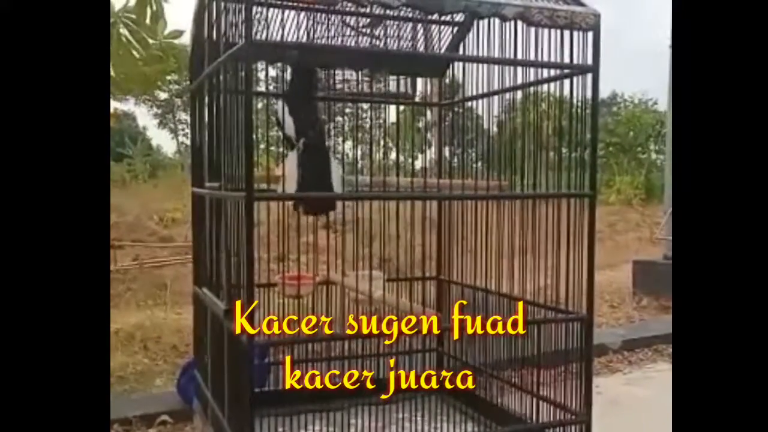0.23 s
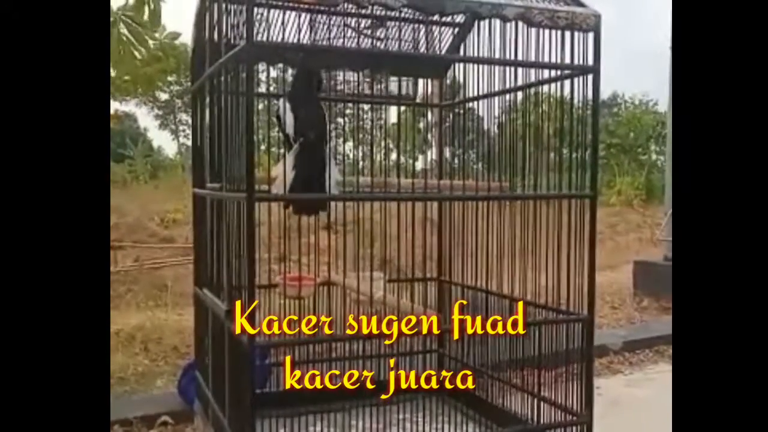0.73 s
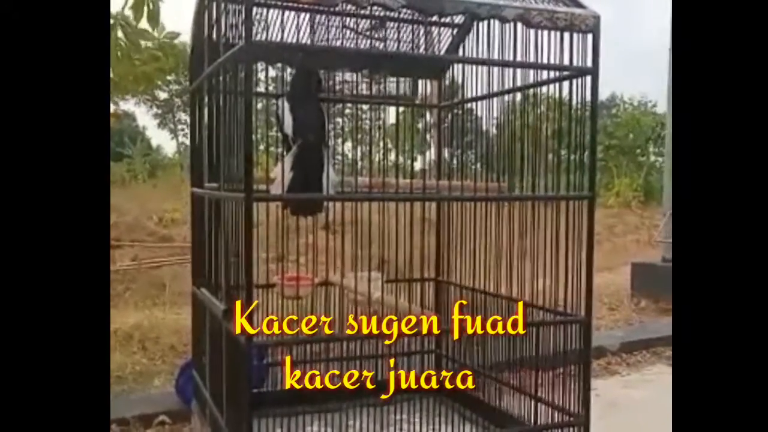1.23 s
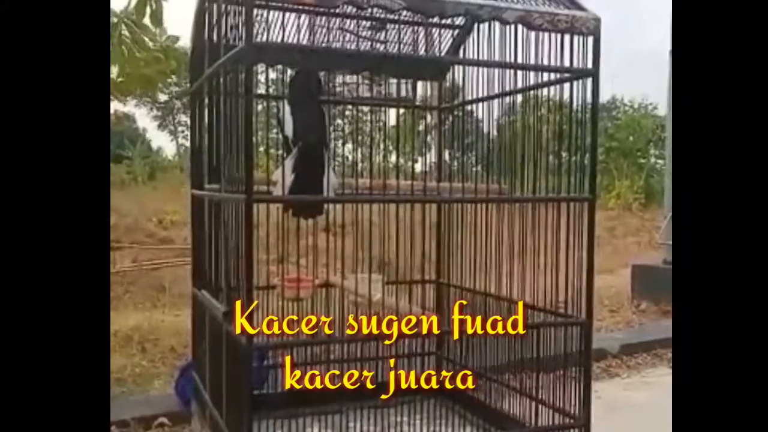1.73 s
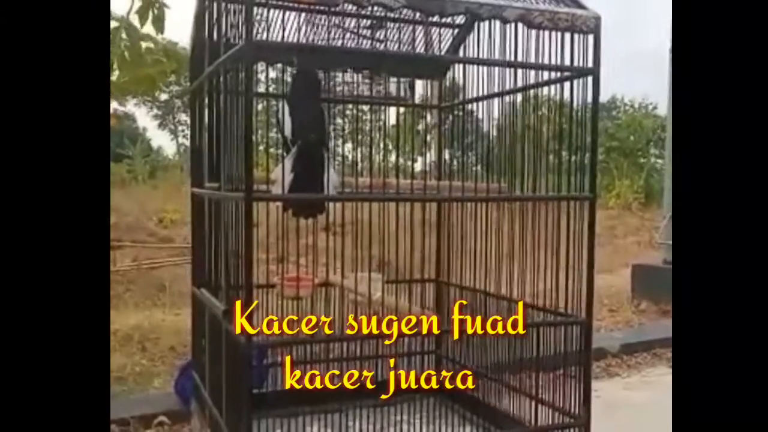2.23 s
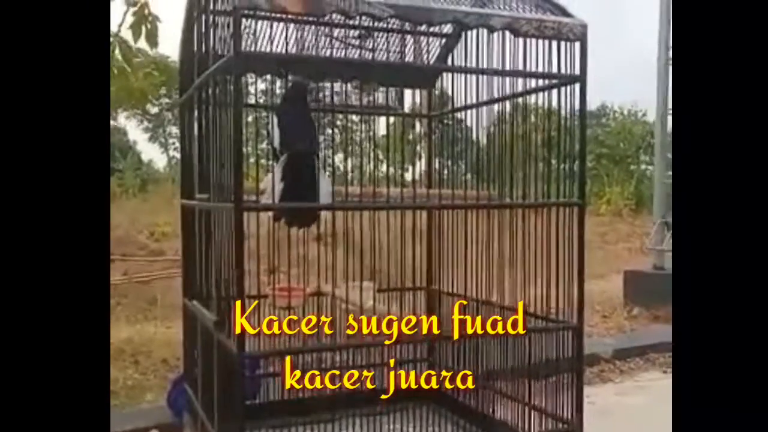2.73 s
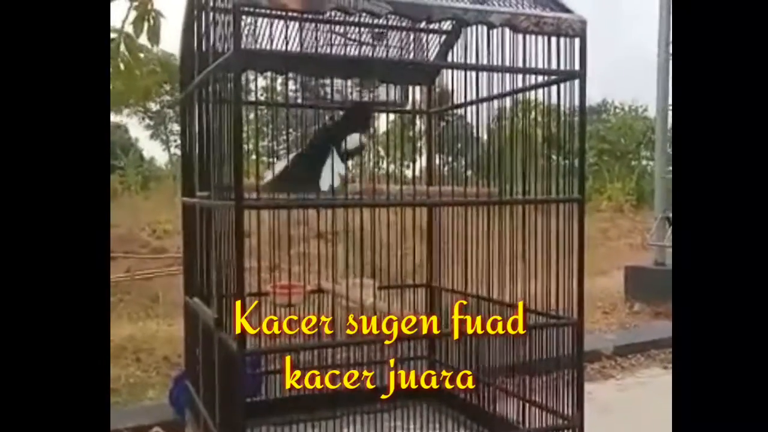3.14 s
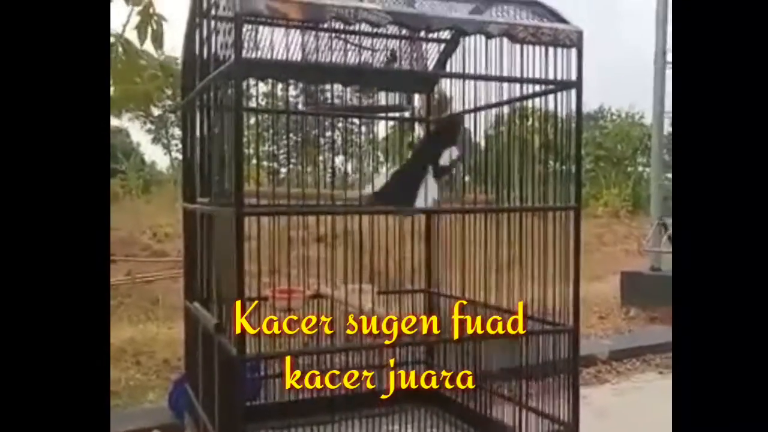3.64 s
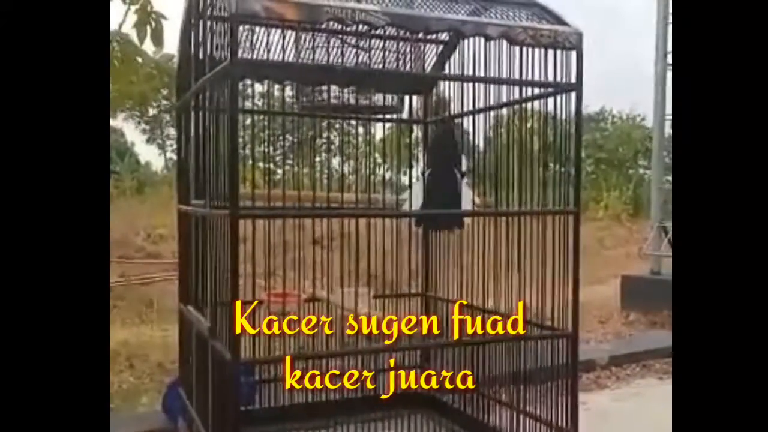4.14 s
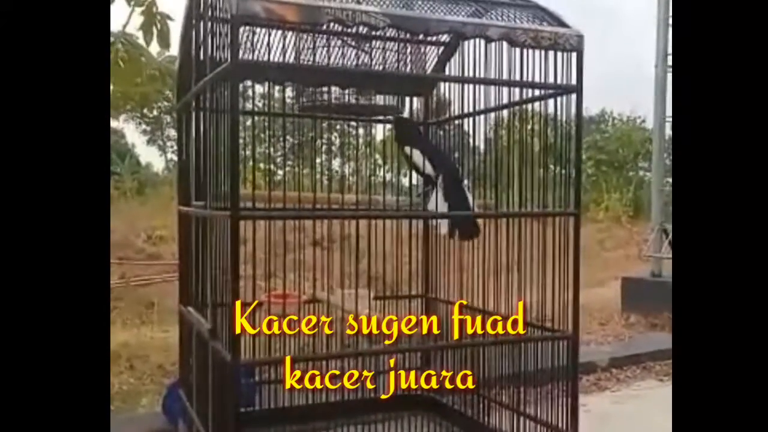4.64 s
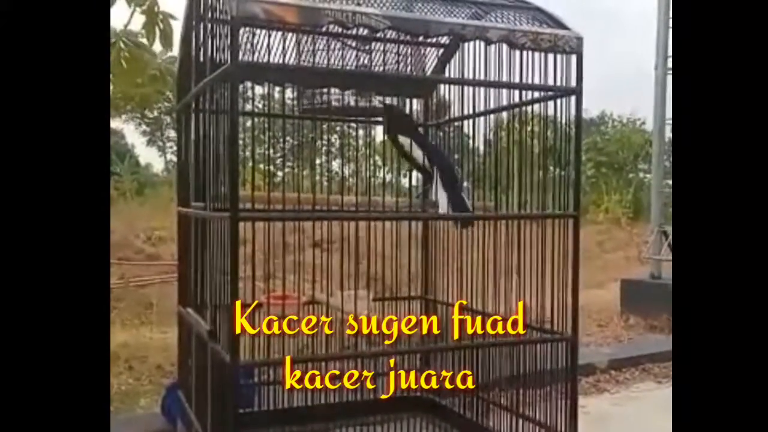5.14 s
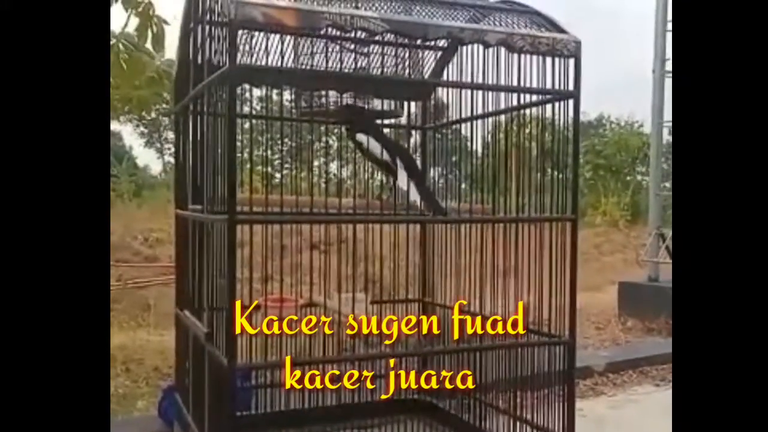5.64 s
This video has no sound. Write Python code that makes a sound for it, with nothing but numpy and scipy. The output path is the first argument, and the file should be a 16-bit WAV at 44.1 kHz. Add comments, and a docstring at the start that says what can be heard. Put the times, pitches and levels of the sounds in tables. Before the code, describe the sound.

A caged songbird sings close to the microphone outdoors, dry and bright, with a faint scattered echo from ground and trees. From 0 to 0.4 s four rapid buzzy trill bursts rattle over a soft low wind bump. A rasp and wavering whistle follow, then a longer nasal note at 0.7 s and small chirps. Around 1.25-1.45 s a strong whistle rises and holds; quick chirps and a loud falling warble lead to a steep downward whistle at 1.9 s. After a short gap, jumpy whistles grow loud at 2.2-2.5 s. Wind puffs bump until 2.8 s. From 2.8 to 3.3 s comes dense scratchy chatter with nasal rasp; a distant rooster wavers behind, 2.4-3.9 s. Clear warbles rise near 4 s, then sharp chirps, flicks and short nasal buzzes until 5.1 s. A thin upward-leaping whistle follows, and faint trills end from 5.55 s. Hum and leaf rustle fade late.

```python
"""Four buzzy trill bursts over a bump of wind, then a caged magpie-robin's varied song, close by outdoors.
Long whistles, chirps, warbles and flicks are gliding sines from the syrinx; nasal rasps are harmonic stacks
through a throat resonance. Fainter trill bursts close the scene. Ground, cage and trees answer as decaying
noise echoes. Behind: shaped-noise wind, hum and rustle, a far cock and a faint held tone."""
import sys
import numpy as np
from scipy import signal
from scipy.fft import rfft, irfft, next_fast_len
from scipy.io import wavfile
from scipy.ndimage import uniform_filter1d, minimum_filter1d, map_coordinates

SR = 44100
rng = np.random.default_rng(int(sys.argv[2]) if len(sys.argv) > 2 else 0)


def master(y):
    """Save y as 16-bit WAV."""
    cut = np.clip(np.atleast_2d(y).T, -1, 1)
    pcm = np.round(cut * 32767)  # scale
    wavfile.write(sys.argv[1], SR, pcm.astype(np.int16))


N = 258861

# background levels: (time [s], wind before its gain [dB], hum [dB], leaf rustle [dB])
AIR_LEVELS = [(0, -38.5, -46, -42.5), (.46, -48.5, -41.5, -38), (1.8, -47.5, -45.5, -44),
              (3.56, -48, -44.5, -43), (4.9, -57.5, -51, -46), (5.87, -63, -61.5, -58)]
# wind puffs on the microphone: (time of peak [s], peak level [dB])
WIND_PUFFS = [(.02, -29), (0.242, -28), (0.502, -31.5), (0.629, -35), (0.978, -33), (1.19, -26.5),
              (2.287, -26), (2.833, -25)]
# noise spectra of wind, hum and leaves: (frequency [Hz], relative density [dB per Hz])
WIND_SPECTRUM = [(20, -37), (70, 0), (125, -3.5), (210, -13.5), (1000, -70)]
HUM_SPECTRUM = [(60, -15.5), (120, 3), (260, -2.5), (350, -7), (550, -7.5), (1000, -13), (1800, -25),
                (4000, -46.5), (9000, -79.5)]
RUSTLE_SPECTRUM = [(700, -22), (1600, -7), (3200, 0), (4300, -6), (5200, -27), (7000, -35), (9500, -48),
                   (15000, -53)]
# far cock, one curve per crow: (time [s], base pitch [Hz], level [dB])
COCK_CROWS = [
    [(2.4, 633.5, -50), (3.1, 556.5, -51), (3.55, 684, -41), (3.8, 640, -57), (3.92, 600, -54)],
]
# faint held tone: (time [s], pitch [Hz], level [dB])
FAR_TONE = [(.86, 1987, -47.5), (1.7, 1975, -42.5)]
# decay of the tree echo: (frequency [Hz], t60 [s])
TREE_DECAY = [(3000, 0.7), (12000, 0.048)]

# beak opening, gain on overtones and hiss: (time [s], gain [dB])
BEAK_OPENING = [(0, 2.5), (.9, 0.5), (1.35, -5), (1.7, -3), (2.0, -4), (2.24, 12), (2.4, -17), (2.85, 8.5),
                (3.8, 4.5), (4.0, -2), (4.7, 9.5), (5.3, 1.5)]
# how overtones get out of the beak: (frequency [Hz], gain [dB])
BEAK_RESPONSE = [(4500, 11.5), (5800, -2.5), (7600, -2), (9800, -21.5), (11500, -14), (16000, -12.5)]
# second, third and fourth harmonic of a whistled tone, before the beak: (level [dB] each)
WHISTLE_OVERTONES_DB = (-36.5, -43, -47.5)
# throat resonance of nasal notes: (frequency / resonance [ratio], gain [dB])
THROAT_RESPONSE = [(.3, -26), (.5, -20.5), (.75, 4.5), (1, 6.5), (1.25, 3), (1.7, -23.5), (2.2, -32),
                   (3.6, -64.5)]

# soft chatter between and under the notes: (start [s], end [s], level [dB])
CHATTER_STRETCHES = [(2.827, 3.249, -35.5), (3.821, 3.928, -34.5), (4.13, 5.161, -41), (5.42, 5.56, -40.5)]
# quick sweeps linking notes: (start [s], from [Hz], to [Hz], level [dB])
FLICK_SWEEPS = [ (.850, 4510, 6610, -36.5), (1.512, 3620, 2100, -27.5), (2.904, 2520, 4470, -24.5),
                (2.924, 4960, 3330, -31.5), (3.079, 2200, 4930, -27), (3.163, 5710, 2474, -33),
                (3.225, 2765, 5600, -26.5), (3.368, 4140, 6270, -42.5), (4.592, 5650, 2870, -29),
                (4.731, 2260, 5780, -39), (4.807, 4240, 2976, -22), ]
# trill bursts: (start [s], level [dB], upper voice level [dB])
TRILL_BURSTS = [(-.04, -20.5, -36.5), (.042, -19, -34.5), (.144, -19.5, -35), (0.249, -20.5, -35.5),
                (5.558, -38, -39.5), (5.659, -32, -42.5), (5.747, -34.5, -41), (5.852, -36.5, -42)]
# parts of a burst: (time from part start [s], pitch [Hz], relative level [dB])
TRILL_LEAD_IN = [(-.022, 2600, -9.5), (-.007, 1800, -22.5), (0, 2000, -12.5)]
TRILL_UPSWEEP = [(0, 2100, -7), (.005, 2750, 0), (.014, 4800, -6)]
TRILL_STROKE = [(0, 4900, -5), (.004, 3650, -1), (.007, 2750, 1), (.0095, 2250, -14)]
TRILL_UPPER = [(0, 5700, -7), (.005, 6450, 1), (.014, 5100, -1)]
# nasal notes: (start [s], length [s], first, middle, last pitch before sag [Hz], level [dB], swell [dB],
# throat resonance at start, at end [Hz], roughness [0-1])
NASAL_NOTES = [ (.435, .052, 1170, 1224, 1362, -23, -4, 3130, 2610, 0.89),
               (.722, 0.25, 779, 864, 781, -18.5, -5, 3320, 2730, 0.2),
               (1.069, 0.091, 1193, 964, 920, -23, -1, 2430, 2390, 0.35),
               (2.968, 0.18, 684, 741.6, 715, -31.5, -7, 2610, 2400, 0.823),
               (3.218, 0.043, 659, 656, 672, -23.5, 3.5, 2530, 1830, 0.37),
               (4.462, 0.045, 997, 862, 897, -26, 4, 3700, 3000, .6),
               (4.806, .056, 1450, 1500, 1950, -22.5, 0, 3050, 3100, .14),
               (4.937, .056, 1258, 1386, 1450, -22, -5, 3200, 3400, .24),
               (5.048, 0.06, 960, 1290, 1083, -25.5, 6, 2460, 3000, 0.44), ]
# short chirps; overlapping ones come from the two sides of the syrinx:
# (start [s], length [s], first, middle, last pitch [Hz], level [dB], swell [dB])
CHIRP_NOTES = [ (0.487, .068, 4010, 4060, 3500, -29.5, 1.5), (0.555, 0.02, 6020, 6020, 5870, -47.5, -7.5),
               (0.62, 0.048, 2200, 3070, 4090, -34, 1), (0.645, .034, 4465, 3240, 4040, -27, -1),
               (0.771, .044, 4680, 5035, 4410, -35.5, 12.5), (0.819, 0.028, 3557, 3240, 3210, -20, -9.5),
               (0.898, 0.028, 3670, 3770, 4050, -20, 4), (1.38, .066, 4650, 4510, 4570, -36, 7.5),
               (1.47, 0.016, 4440, 2940, 3850, -19.5, -1.5), (1.488, .028, 3820, 3874, 3740, -26, -11.5),
               (1.53, 0.012, 2235, 2820, 4160, -27.5, -3.5), (1.541, .076, 4480, 4155, 4100, -21, 17),
               (1.568, 0.035, 2880, 3880, 2500, -24, -2), (1.691, .072, 4260, 4950, 4480, -28, 7.5),
               (1.738, .054, 3200, 2980, 2563, -8, 14), (1.778, .034, 3965, 3880, 3235, -22, -0.5),
               (1.786, 0.033, 2640, 2070, 1770, -30.5, -15), (1.83, 0.025, 2995, 4180, 4790, -23.5, -9.5),
               (2.438, 0.056, 3260, 3570, 3636, -14.5, -1.5), (2.828, .034, 2846, 3200, 4220, -31, -2.5),
               (2.862, 0.046, 3280, 2750, 2630, -29, -5.5), (2.922, 0.041, 4080, 4840, 4360, -38.5, 3),
               (2.997, 0.027, 3760, 3934, 4190, -29.5, -4.5), (3.037, 0.046, 3690, 3240, 2550, -27.5, 1.5),
               (3.054, 0.032, 6960, 5520, 5580, -44, -3), (3.086, 0.041, 4370, 4030, 3885, -25.5, 10),
               (3.129, 0.039, 7000, 5880, 6220, -39, -5), (3.167, 0.016, 2490, 2310, 2350, -34, 5.5),
               (3.181, 0.025, 3300, 3266, 3380, -24, 19.5), (3.208, 0.022, 4060, 3266, 2690, -20, 2.5),
               (3.225, 0.022, 4630, 4440, 5070, -27.5, 8.5), (3.425, 0.099, 3370, 2950, 2587, -22, -3),
               (3.473, 0.08, 3910, 4414, 3875, -32, 2.5), (3.58, 0.074, 2955, 2787, 2970, -22.5, 7),
               (3.648, 0.029, 2725, 2620, 2590, -23, -11), (3.648, 0.021, 4080, 3910, 3940, -22.5, -2),
               (3.798, 0.041, 3276, 2614, 2485, -27, -3.5), (4.155, .028, 2390, 2714, 3770, -25.5, 15),
               (4.287, 0.019, 2400, 2245, 2350, -28, -1), (4.303, .022, 5900, 6070, 6020, -40, -9.5),
               (4.34, 0.059, 1927, 2430, 2754, -33, 16.5), (4.446, 0.036, 3300, 4025, 3594, -23.5, 2.5),
               (4.453, 0.034, 1860, 1975, 1640, -33, -5), (4.563, 0.044, 5980, 6220, 5500, -44, -7),
               (4.571, .024, 3390, 4340, 3860, -34.5, -4.5), (4.593, 0.024, 3060, 2546, 2710, -30.5, -7),
               (4.64, .02, 3550, 4760, 4440, -30.5, -5), (4.659, 0.015, 4200, 3100, 3820, -23.5, 0.5),
               (4.708, 0.028, 2920, 2334, 2370, -34, 13), (4.79, 0.02, 2190, 2870, 4470, -30, 19.5),
               (4.928, 0.016, 2230, 2810, 3530, -27.5, 15), ]
# warbled notes: (start [s], length [s], first, middle, last centre pitch [Hz], level [dB], swell [dB],
# vibrato depth [Hz], vibrato rate [Hz])
WARBLE_NOTES = [ (1.614, .034, 3930, 3985, 3590, -18, 0, 149.5, 63.2),
                (1.645, .087, 3700, 3350, 2534, -14, -7.5, 377, 63.8),
                (2.389, 0.046, 3220, 3050, 2990, -15, 1, 511, 32.7),
                (2.482, .068, 3364, 2840, 3850, -20, -4, 525, 37.65),
                (2.973, .05, 1980, 2040, 2150, -22, 5, 115, 152),
                (3.022, .128, 2330, 2142, 1887, -25, -8, 169.7, 77.3),
                (3.734, 0.053, 3123, 3146, 3250, -18, 5.5, 77.6, 88.3),
                (3.781, 0.043, 3276, 3344, 3190, -17, 4, 190.2, 87.1),
                (3.916, .073, 3246, 3363, 3790, -18.5, 1, 50.7, 129.8),
                (3.987, 0.054, 3760, 4236, 4240, -14.5, -7.5, 133.2, 59.1),
                (4.398, .054, 2630, 3180, 3230, -27, 2, 160, 51.4), ]
# stutters where the two sides of the syrinx beat: (start [s], end [s], beat rate [Hz])
BEAT_SPANS = [(1.26, 1.298, 170.6), (1.912, 1.948, 192), (3.915, 3.94, 352), (3.962, 3.992, 170),
              (5.38, 5.422, 171)]
# long whistles, one curve each: (time [s], pitch [Hz], level [dB])
WHISTLE_CURVES = [
    [(0.455, 2290, -28), (0.471, 2230, -19.5), (0.513, 2305, -17), (0.541, 2195, -27.5),
     (0.615, 2323, -16.5), (0.631, 2175, -28), (0.642, 2115, -34)],
    [(1.253, 1820, -35), (1.268, 2710, -17.5), (1.283, 2902, -18), (1.333, 2713, -15.5),
     (1.353, 2951, -16.5), (1.375, 3080, -6.5), (1.448, 3015, -7.5), (1.456, 2615, -14.5),
     (1.466, 2660, -22)],
    [(1.853, 3555, -20), (1.869, 3380, -8.5), (1.897, 2953, -12), (1.911, 2652, -8.5), (1.917, 2356, -15),
     (1.947, 1562, -33.5), (1.97, 1544, -35)],
    [(2.166, 4422, -30.5), (2.19, 4440, -23.5), (2.2, 4274, -25.5), (2.218, 5210, -35), (2.242, 5280, -40),
     (2.266, 4480, -19.5), (2.304, 4114, -24), (2.32, 3380, -15), (2.358, 3873, -17), (2.394, 3796, -7)],
    [(4.184, 2520, -16.5), (4.192, 3274, -16.5), (4.207, 3650, -25), (4.222, 2640, -20.5),
     (4.237, 2570, -21.5), (4.251, 3236, -9.5), (4.258, 2923, -15), (4.265, 4050, -19), (4.272, 4220, -23)],
    [(5.19, 2920, -32.5), (5.22, 3880, -23), (5.25, 4020, -15.5), (5.262, 4204, -25.5), (5.3, 4550, -28.5),
     (5.342, 6590, -50), (5.376, 6670, -41.5), (5.402, 4830, -38.5), (5.42, 4074, -22), (5.433, 4024, -25)],
]

ATTACK_SHARE, RELEASE_S = .11, .003  # whistled notes: rise as a share of length, quick cut-off
NASAL_ATTACK_S, NASAL_RELEASE_S = .013, .014
SAG_SHARE, SAG_STEEPNESS = .38, 6.9  # nasal pitch sags at its end, as the pressure drops
GAPE_FROM_HZ, GAPE_FULL_HZ = 3300, 7600  # over this band the beak opening takes hold on nasal notes
DRONE_HZ, DRONE_PEAK_DB = 257.4, -7.5  # tone in the hum; level relative to the hum
FLICK_S, BEAT_DEPTH, TOP_HZ = .007, .75, 15700


def amp(db):
    """Decibels to gain."""
    return 10 ** (np.asarray(db) / 20)


def unit(x):
    """Scale to rms 1."""
    return x / np.sqrt(np.mean(x ** 2) + 1e-20)


def along(points, hz):
    """Read (frequency, value) points on a log frequency axis."""
    f, v = np.transpose(points)
    return np.interp(np.log(hz + 1e-9), np.log(f), v)


def curves(rows):
    """One value per scene sample for each column after the time."""
    s, *cols = np.transpose(rows)
    return [np.interp(np.arange(N) / SR, s, c) for c in cols]


def gesture(rows):
    """Sample times of one note, then its controls at those times."""
    s, *cols = np.transpose(rows)
    t = s[0] + np.arange(int((s[-1] - s[0]) * SR) + 2) / SR
    return [t] + [np.interp(t, s, c) for c in cols]


def glide(start_s, length_s, first_hz, middle_hz, last_hz, db, swell_db, attack_s, release_s):
    """Times, pitch and level of one note: pitch bends in one arc; level rises, swells or fades, is released."""
    t = np.arange(int(length_s * SR)) / SR
    u = t / length_s
    bend_hz = 2 * middle_hz - first_hz - last_hz
    hz = first_hz + (last_hz - first_hz) * u + bend_hz * 2 * u * (1 - u)
    edges = np.clip(np.minimum(t / attack_s, (length_s - t) / release_s), 1e-3, 1)
    return start_s + t, hz, db + swell_db * (u - .5) + 20 * np.log10(edges)


def wobble(rate_hz, size):
    """Smooth random curve, rate_hz knots a second."""
    knots = rng.standard_normal(int(size * rate_hz / SR) + 4)
    return map_coordinates(knots, [np.arange(size) * rate_hz / SR])


def filtered(x, response):
    """Multiply the spectrum of x by a response of frequency."""
    m = next_fast_len(N + SR // 2)
    return irfft(rfft(x, m) * response(np.fft.rfftfreq(m, 1 / SR)), m)[:N]


def noise(spectrum):
    """Coloured noise of rms 1."""
    return unit(filtered(rng.standard_normal(N), lambda hz: amp(along(spectrum, hz))))


def patchy(spectrum, patchy_db):
    """Noise of rms 1 that comes and goes in narrow patches of time and frequency."""
    z = signal.stft(noise(spectrum), nperseg=2048)[2]
    patches = uniform_filter1d(rng.standard_normal(z.shape), size=2, axis=0)
    patches = unit(uniform_filter1d(patches, size=10, axis=1))
    return unit(signal.istft(z * amp(patchy_db * patches), nperseg=2048)[1][:N])


def add(track, t, note):
    """Mix a note in at its times, ends softened over a millisecond."""
    i = round(t[0] * SR) + np.arange(len(t))
    inside = (i >= 0) & (i < N)
    ends = np.clip(np.minimum(t - t[0], t[-1] - t) / .001, 0, 1)
    track[i[inside]] += (note * np.sin(ends * np.pi / 2) ** 2)[inside]


def whistle(t, hz, db, bright_db=0.0, grain=.0087, glide_grain=.037, hiss_db=-60):
    """One side of the syrinx: a slightly unsteady sine, rougher in fast glides, with weak ragged overtones."""
    size = len(t)
    hz = uniform_filter1d(hz, size=90)
    speed = np.abs(np.gradient(np.log(hz))) * SR
    # held notes are steady, gliding ones flutter in level
    flutter_db = (.3 + 2.1 * np.tanh(speed / 4)) * wobble(200, size)
    hz = hz * (1 + .004 * wobble(400, size))
    phase = 2 * np.pi * np.cumsum(hz) / SR
    roughness = grain + glide_grain * np.tanh(speed / 20)
    rough = wobble(2400, size) * np.sin(phase) + wobble(2400, size) * np.cos(phase)
    tone = np.sin(phase) + roughness * rough
    upper = amp(hiss_db) * rng.standard_normal(size)
    for k, level_db in enumerate(WHISTLE_OVERTONES_DB, 2):
        ragged = np.sin(k * phase + .8 * wobble(900, size)) * (1 + .5 * wobble(400, size))
        overtone_db = level_db + bright_db + along(BEAK_RESPONSE, k * hz)
        upper = upper + amp(overtone_db) * ragged * (k * hz < SR / 2)
    gape_db = np.interp(t, *np.transpose(BEAK_OPENING))
    return np.sqrt(2) * (tone + amp(gape_db) * upper) * amp(db + flutter_db)


def scatter(t60_s):
    """Dense run of reflections of energy 1 that dies away."""
    t = np.arange(SR // 2) / SR
    tail = rng.standard_normal(len(t)) * amp(-60 * t / t60_s) * (t > .0015)
    return tail / np.linalg.norm(tail)


def outdoors(wind_gain_db=2, puff_sigma_s=.02):
    """Light wind with single puffs on the microphone, over a distant hum and a rustle of leaves."""
    wind_db, hum_db, rustle_db = curves(AIR_LEVELS)
    t = np.arange(N) / SR
    puffs = sum(amp(db) * np.exp(-((t - s) / puff_sigma_s) ** 2 / 2) for s, db in WIND_PUFFS)
    steady = amp(wind_db + wind_gain_db + .92 * wobble(2.8, N))
    wind = np.hypot(steady, puffs) * noise(WIND_SPECTRUM)
    drone_gain = amp(DRONE_PEAK_DB + 4.1 * wobble(12, N))
    drone = drone_gain * np.sin(2 * np.pi * np.cumsum(DRONE_HZ + 1.5 * wobble(1.4, N)) / SR)
    hum = amp(hum_db) * (patchy(HUM_SPECTRUM, patchy_db=4.0) + drone)
    return wind + hum + amp(rustle_db) * patchy(RUSTLE_SPECTRUM, patchy_db=4.5)


def cock(harmonics_db=(-9, -3, -16)):
    """A far, wavering crow, mostly its second harmonic."""
    out = np.zeros(N)
    for crow in COCK_CROWS:
        t, hz, db = gesture(crow)
        phase = 2 * np.pi * np.cumsum(hz * (1 + .0054 * wobble(110, len(t)))) / SR
        voice = sum(amp(level_db) * np.sin(k * phase) for k, level_db in enumerate(harmonics_db, 1))
        add(out, t, amp(db) * voice)
    return out


def far_whistle():
    """A thin, nearly steady whistled tone behind the song."""
    out = np.zeros(N)
    t, hz, db = gesture(FAR_TONE)
    add(out, t, whistle(t, hz, db))
    return out


def surroundings(song, near_db=-17, trees_db=-27):
    """Cage and ground reflect almost at once; trees scatter a thin tail that decays faster in the treble."""
    hz, s, z = signal.stft(rng.standard_normal(SR // 2), SR, nperseg=256)
    decay = amp(-60 * s / along(TREE_DECAY, hz)[:, None])
    tail = signal.istft(z * decay, SR, nperseg=256)[1][:SR // 2]
    near = scatter(t60_s=.035)
    echo = amp(near_db) * near + amp(trees_db) * tail / np.linalg.norm(tail)
    return signal.fftconvolve(song, echo)[:N]


def chatter(low_hz=2300, high_hz=4400, life_s=.043, per_s=28, shift_s=.0061):
    """Soft, short, scratchy whistled glides of random shape, per_s of them a second."""
    out = np.zeros(N)
    for start, end, db in CHATTER_STRETCHES:
        for s in np.linspace(start, end - life_s, int((end - start) * per_s)):
            shift, pitch, first, last, size = rng.uniform(-1.1, 1, 5)
            mid_hz = low_hz + (high_hz - low_hz) * (pitch + 1) / 2
            t, hz, swell_db = gesture([(0, mid_hz * (1 + .2 * first), -8),
                                       (life_s / 2, mid_hz, 0),
                                       (life_s, mid_hz * (1 + .2 * last), -8)])
            note = whistle(s + t, hz, db + 3 * size + swell_db, grain=.18)
            add(out, s + shift_s * shift + t, note)
    return out


def flicks():
    """Steep whistled sweeps of a few milliseconds that swell and fade."""
    out = np.zeros(N)
    for s, from_hz, to_hz, db in FLICK_SWEEPS:
        t, hz = gesture([(s, from_hz), (s + FLICK_S, to_hz)])
        add(out, t, whistle(t, hz, db) * np.hanning(len(t)) ** .5)
    return out


def trills(first_s=.014, period_s=.0154, fall_db=1.0, upper_start_s=.027, upper_fall_db=1.55, count=5):
    """Bursts sweep up, then drop in fading strokes; the other side chirps above; echoes blur the gaps."""
    out = np.zeros(N)
    for s, db, upper_db in TRILL_BURSTS:
        parts = [(TRILL_LEAD_IN, s, db), (TRILL_UPSWEEP, s, db)]
        for i in range(count):
            parts.append((TRILL_STROKE, s + first_s + i * period_s, db - fall_db * i ** 2))
        for i in range(count - 1):
            parts.append((TRILL_UPPER, s + upper_start_s + i * period_s, upper_db - upper_fall_db * i))
        for shape, start, level_db in parts:
            t, hz, swell_db = gesture(shape)
            # no two strokes are quite alike
            late_s, sharp, louder_db = rng.normal(0, [.0006, .02, 1])
            t = t + start + late_s
            level_db = level_db + louder_db + swell_db
            add(out, t, whistle(t, hz * (1 + sharp), level_db, grain=.12, hiss_db=-35))
    return out + amp(-8.5) * signal.fftconvolve(out, scatter(t60_s=.13))[:N]


def nasals(jitter=.093, rasp=.99, uneven_db=3.5):
    """Low pulsing of the syrinx: a harmonic stack through the moving throat resonance."""
    out = np.zeros(N)
    k = np.arange(1, 17)[:, None]  # harmonic numbers
    for *note, throat_start_hz, throat_end_hz, rough in NASAL_NOTES:
        t, hz, db = glide(*note, NASAL_ATTACK_S, NASAL_RELEASE_S)
        size = len(t)
        sag = 1 - SAG_SHARE * np.linspace(0, 1, size) ** SAG_STEEPNESS
        hz = hz * sag * (1 + jitter * rough * wobble(600, size))
        throat_hz = np.linspace(throat_start_hz, throat_end_hz, size)
        gape_share = along([(GAPE_FROM_HZ, 0), (GAPE_FULL_HZ, 1)], k * hz)
        open_db = np.interp(t, *np.transpose(BEAK_OPENING)) * gape_share
        flutter_db = uneven_db * np.array([wobble(43.8, size) for _ in k])
        weights_db = along(THROAT_RESPONSE, k * hz / throat_hz) + open_db + flutter_db
        weights = amp(weights_db) * (k * hz < SR / 2)
        weights = weights / np.linalg.norm(weights, axis=0)
        # uneven pulses smear each harmonic into its neighbours
        uneven = 1 + rasp * rough * np.array([wobble(1100, size) for _ in k])
        stack = np.sum(weights * uneven * np.sin(2 * np.pi * k * np.cumsum(hz) / SR), axis=0)
        add(out, t, unit(stack) * amp(db))
    return out


def chirps():
    """Short whistled arcs."""
    out = np.zeros(N)
    for note in CHIRP_NOTES:
        t, hz, db = glide(*note, ATTACK_SHARE * note[1], RELEASE_S)
        add(out, t, whistle(t, hz, db, bright_db=2, grain=.079, glide_grain=.12, hiss_db=-53.5))
    return out


def beating():
    """Gain that stutters while the two sides of the syrinx beat."""
    out = np.ones(N)
    for start, end, rate_hz in BEAT_SPANS:
        t = np.arange(start, end, 1 / SR)
        depth = BEAT_DEPTH * np.hanning(len(t)) ** .5
        add(out, t, depth * np.cos(2 * np.pi * rate_hz * (t - start)))
    return out


def warbles():
    """Fast vibrato swings the pitch; the tone is full at each turn and dips in between."""
    out = np.zeros(N)
    for *note, depth_hz, rate_hz in WARBLE_NOTES:
        t, hz, db = glide(*note, ATTACK_SHARE * note[1], RELEASE_S)
        swing = np.cos(2 * np.pi * rate_hz * (t - t[0]))
        pulse_db = 6 * (swing ** 2 - .5)
        add(out, t, whistle(t, hz + depth_hz * swing, db + pulse_db, bright_db=3))
    return out


def whistles():
    """Pure gliding notes."""
    out = np.zeros(N)
    for curve in WHISTLE_CURVES:
        t, hz, db = gesture(curve)
        add(out, t, whistle(t, hz, db))
    return out


def scene():
    """The bird, its echoes and the background."""
    song = (whistles() + warbles()) * beating()
    song = song + chirps() + flicks() + nasals() + trills() + chatter()
    return (song + surroundings(song) + far_whistle() + cock() + outdoors())[None]


def record(dry):
    """A limiter holds the loudest peaks down; nothing is kept above the band limit."""
    needed = np.minimum(1, .88 / (np.abs(dry[0]) + 1e-9))
    gain = uniform_filter1d(minimum_filter1d(needed, size=441), size=441)
    return filtered(dry[0] * gain, lambda hz: hz < TOP_HZ)[None]


dry = scene()
out = record(dry)
master(out)
```